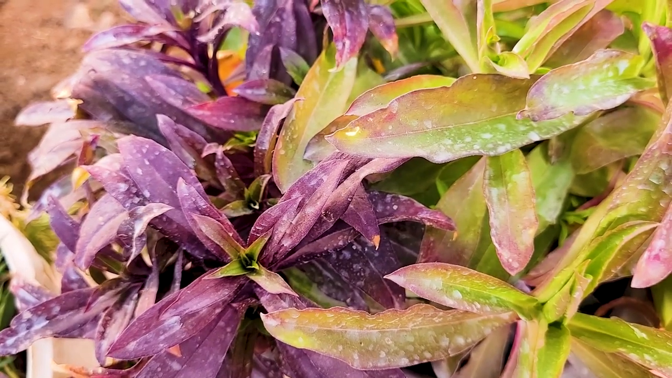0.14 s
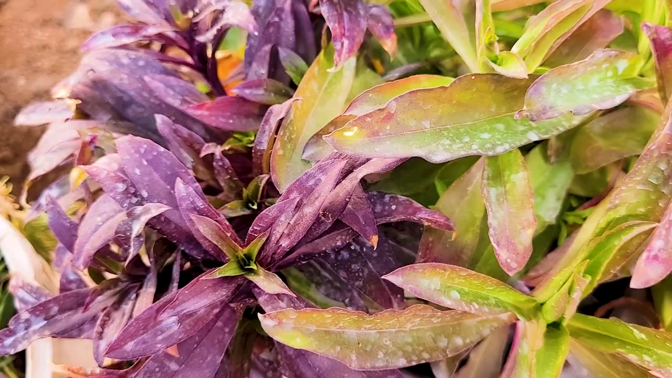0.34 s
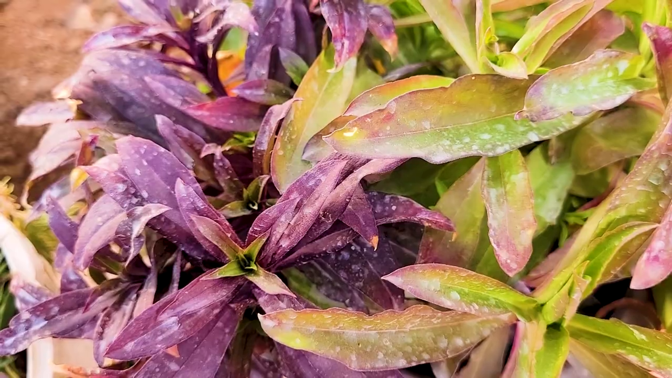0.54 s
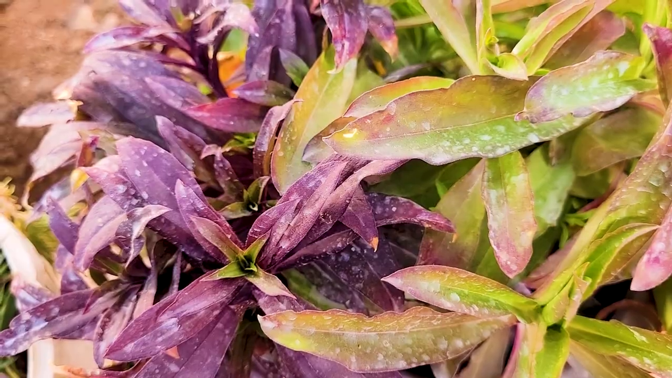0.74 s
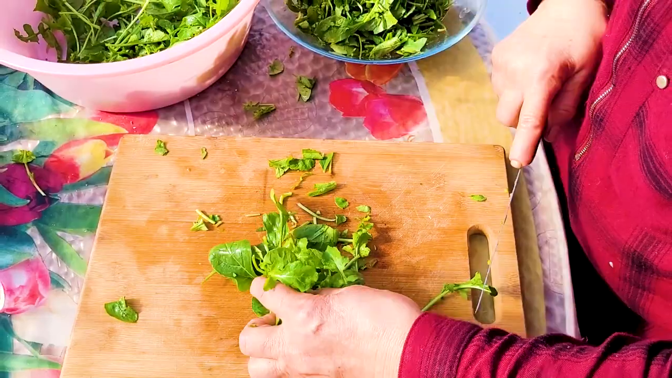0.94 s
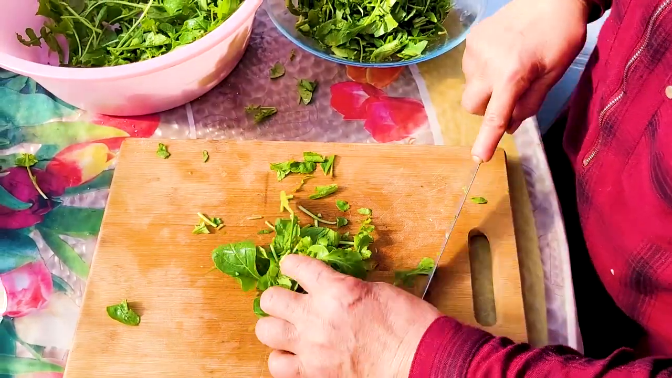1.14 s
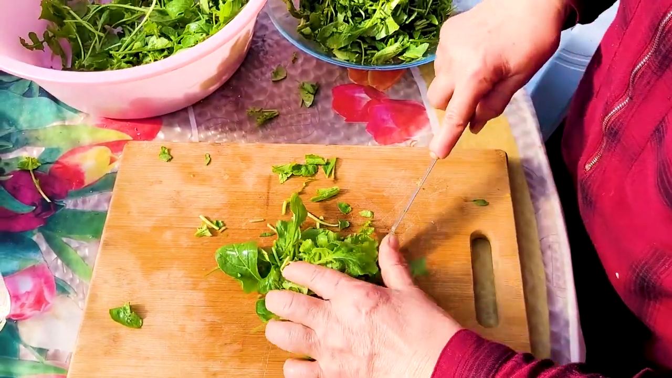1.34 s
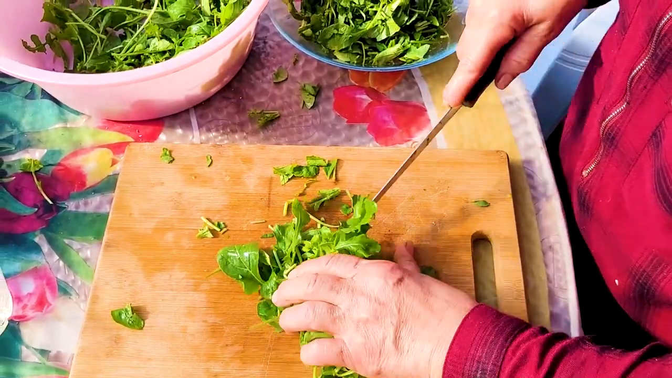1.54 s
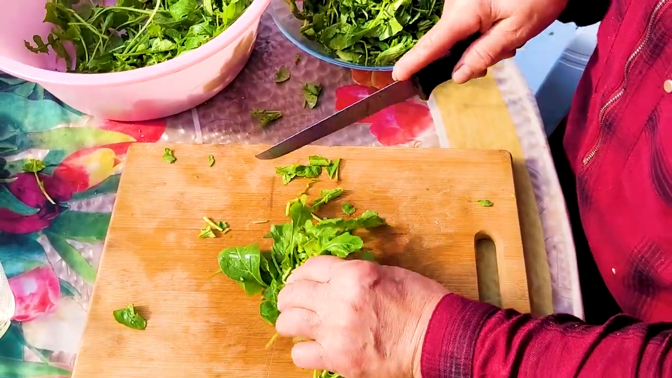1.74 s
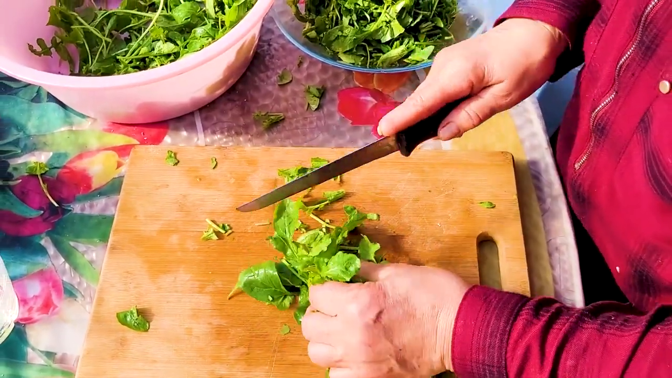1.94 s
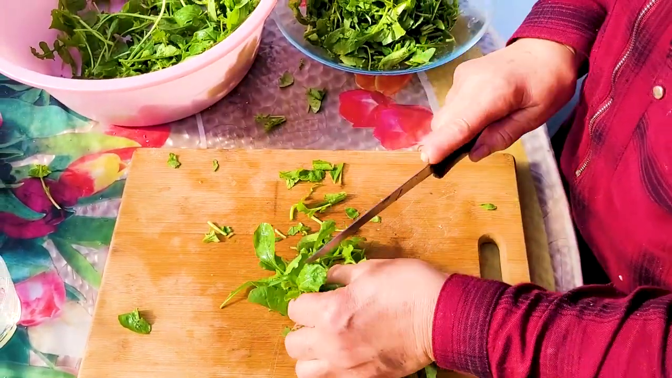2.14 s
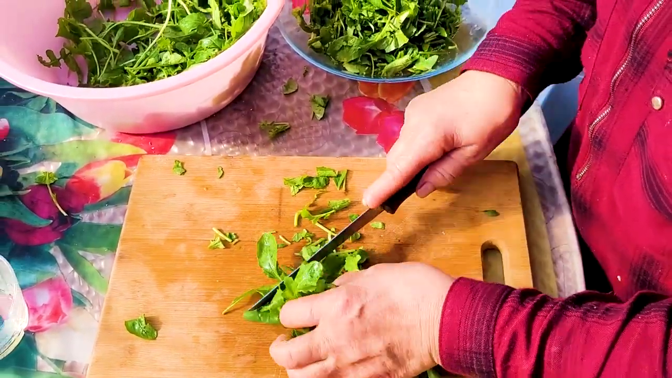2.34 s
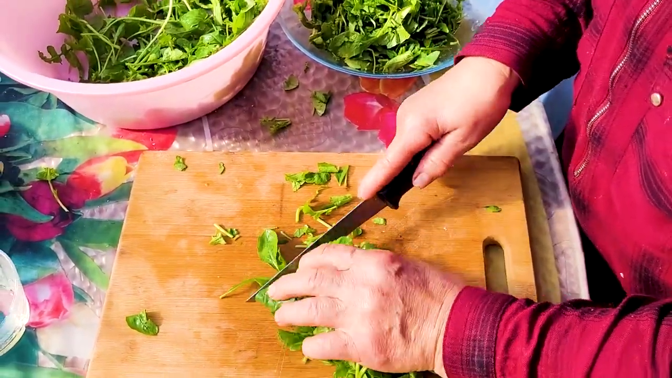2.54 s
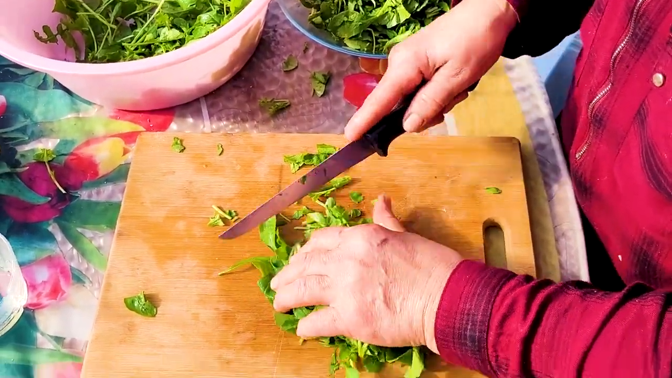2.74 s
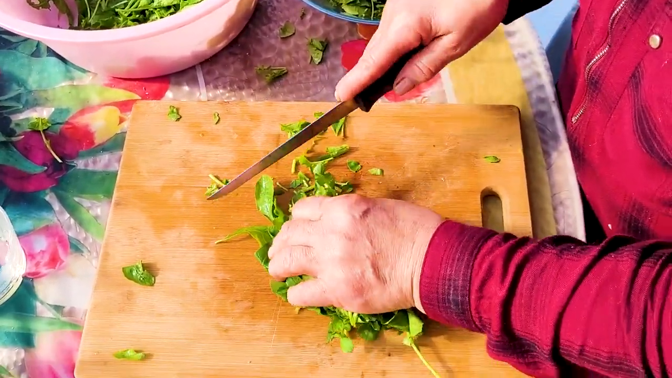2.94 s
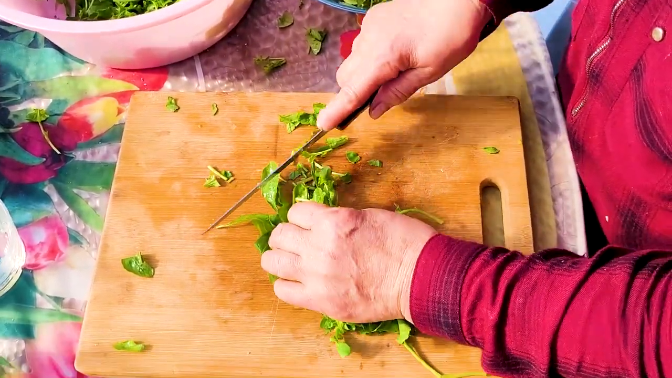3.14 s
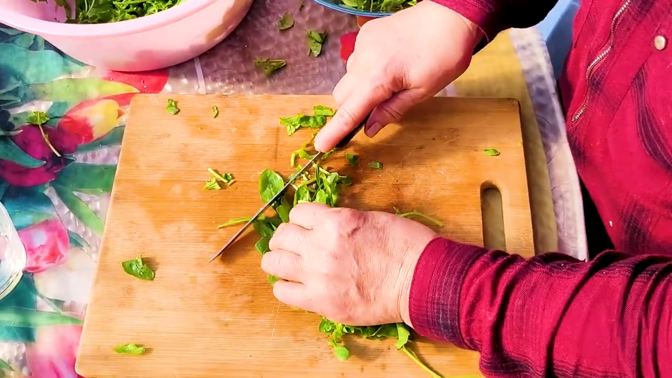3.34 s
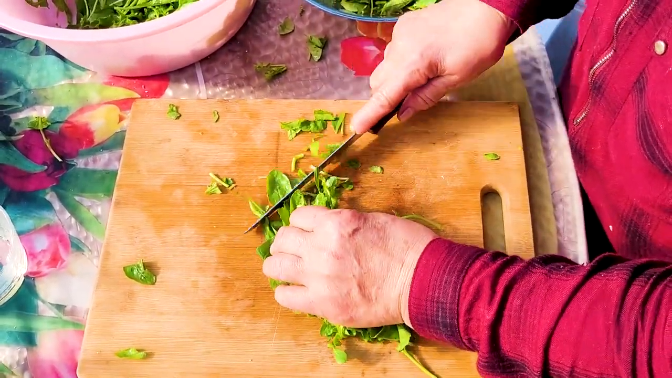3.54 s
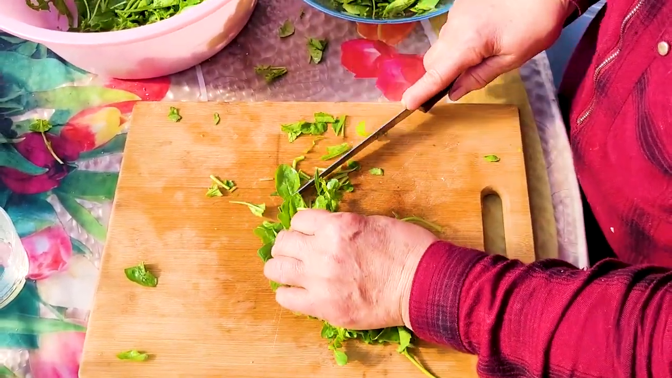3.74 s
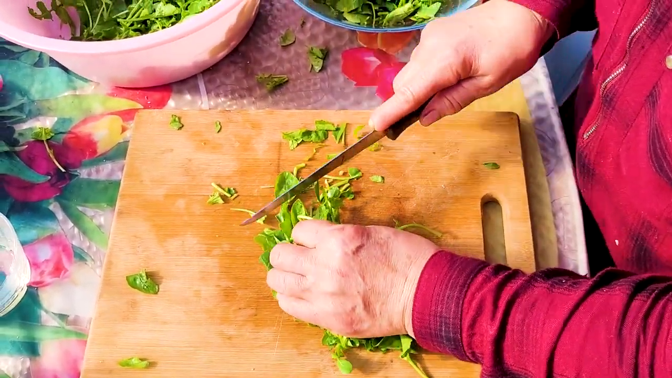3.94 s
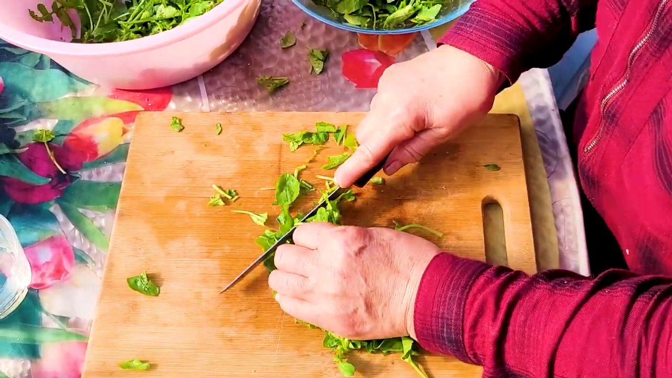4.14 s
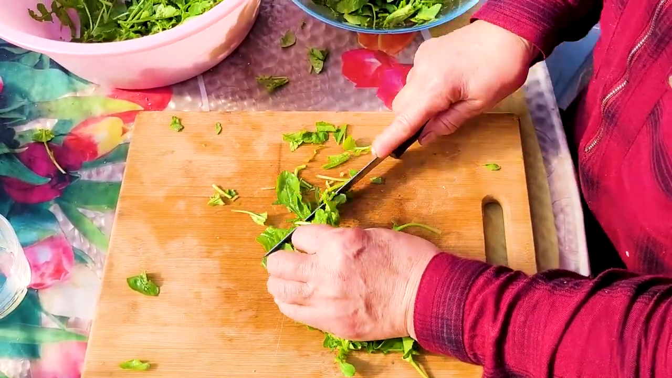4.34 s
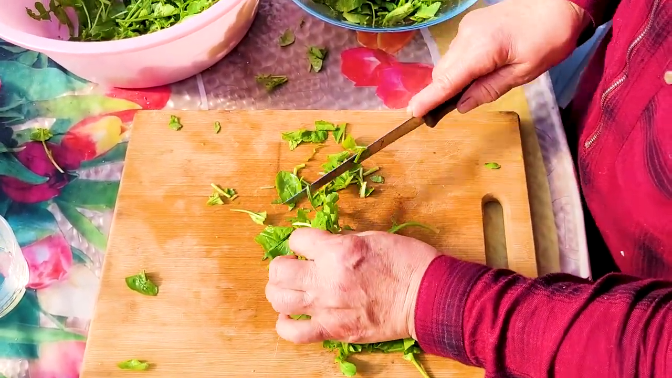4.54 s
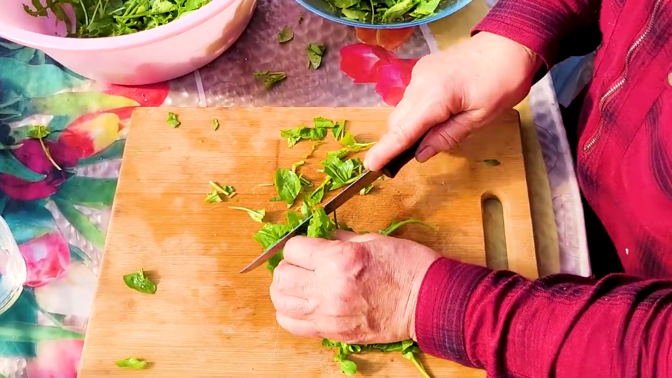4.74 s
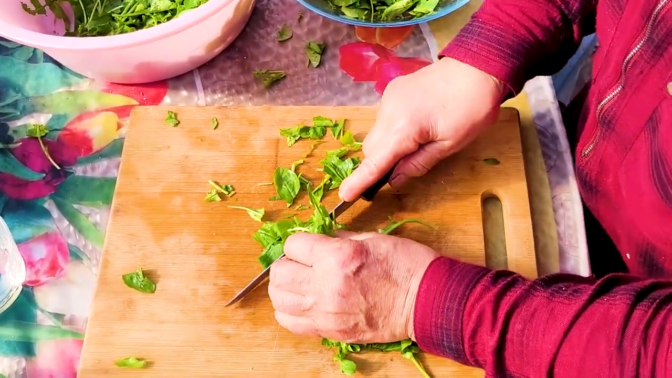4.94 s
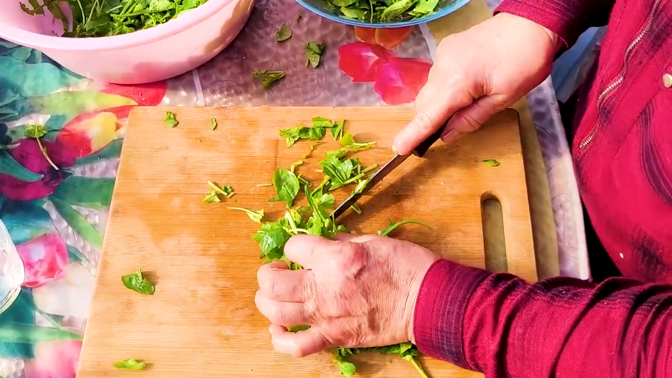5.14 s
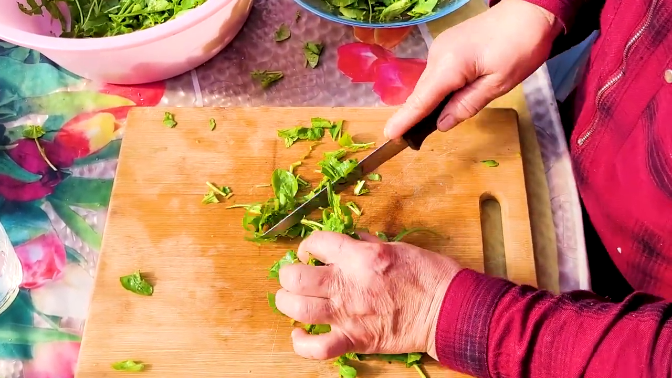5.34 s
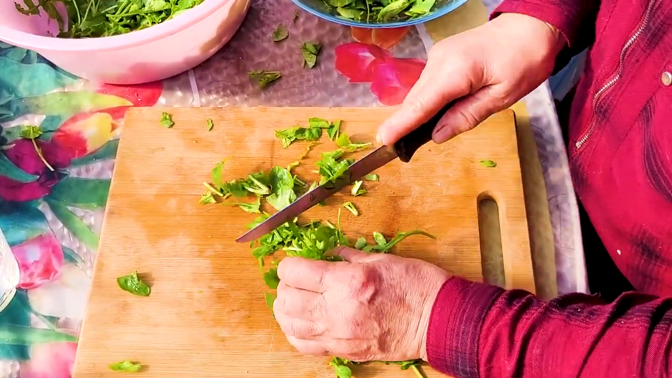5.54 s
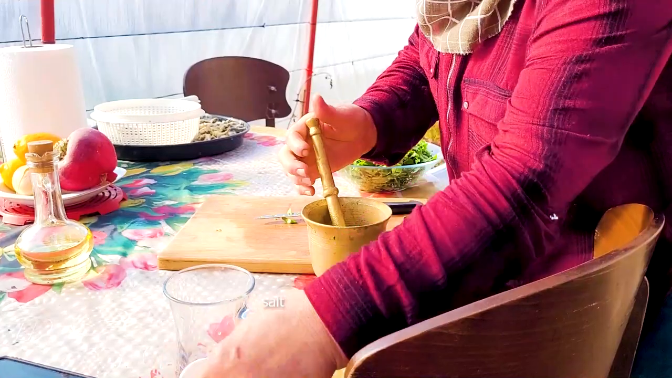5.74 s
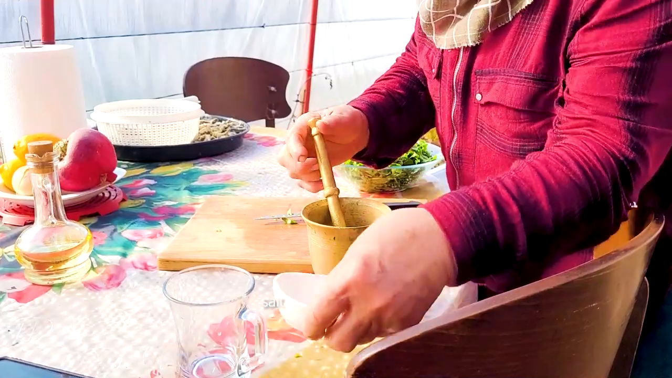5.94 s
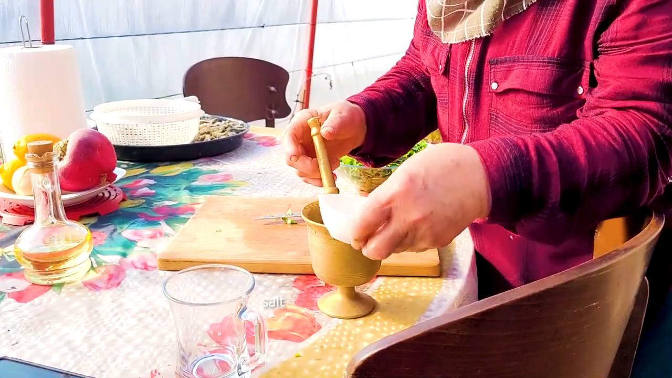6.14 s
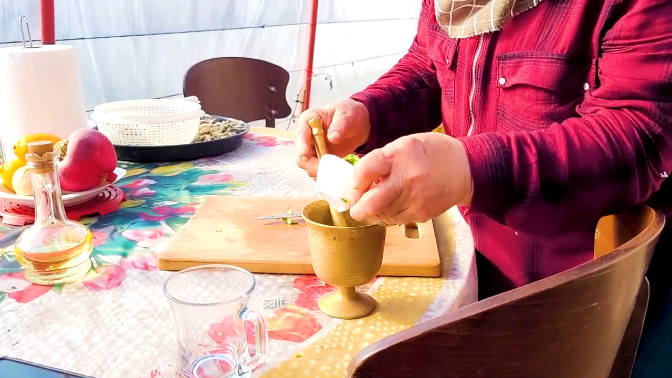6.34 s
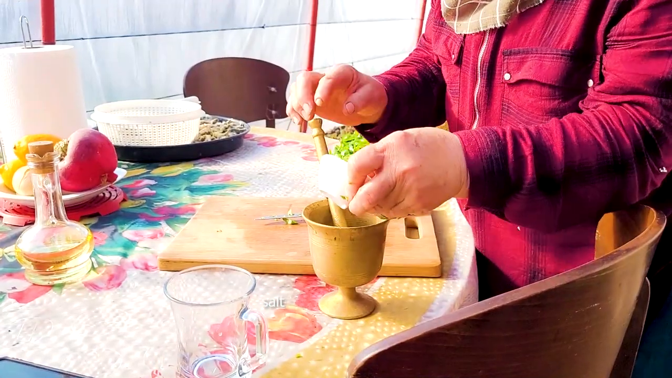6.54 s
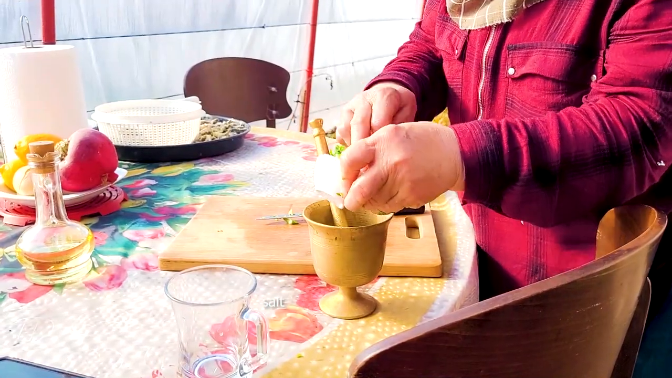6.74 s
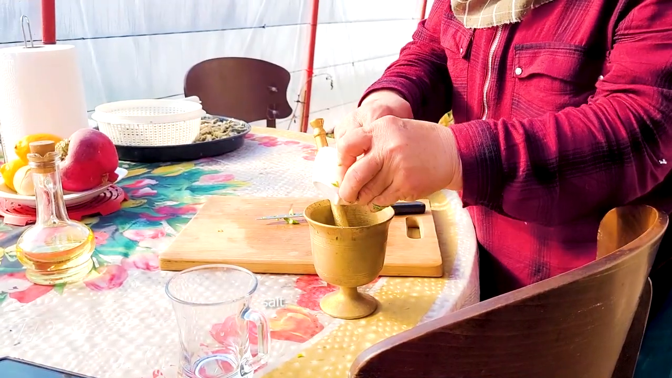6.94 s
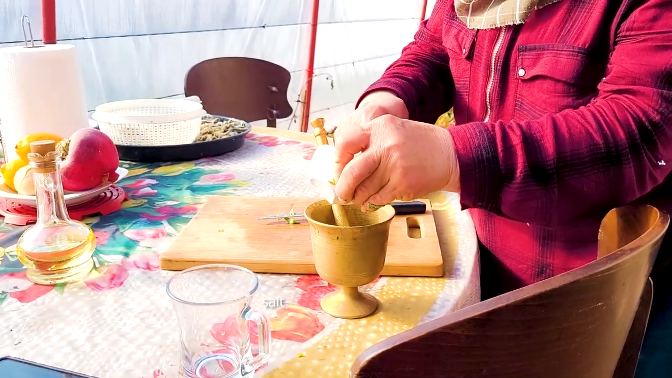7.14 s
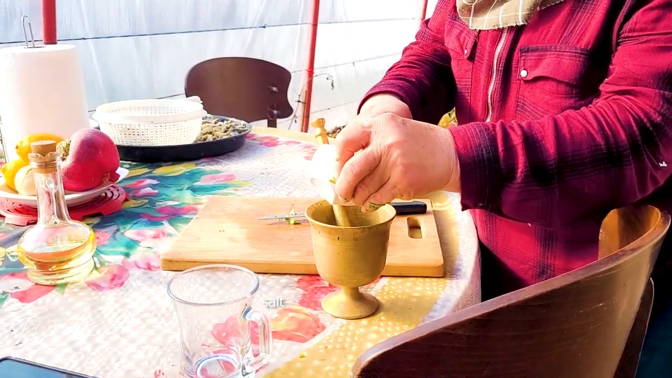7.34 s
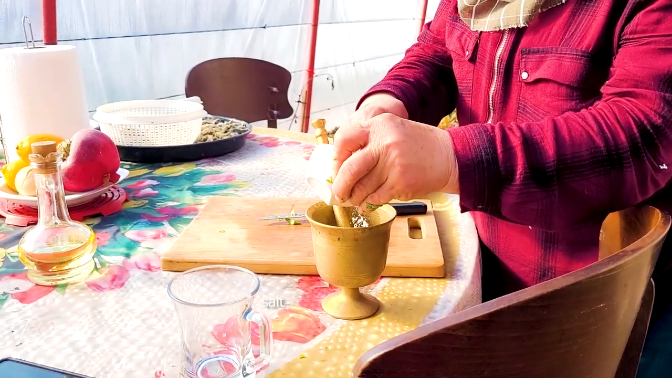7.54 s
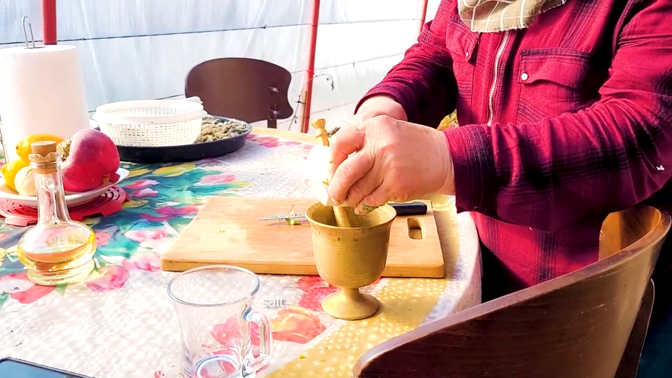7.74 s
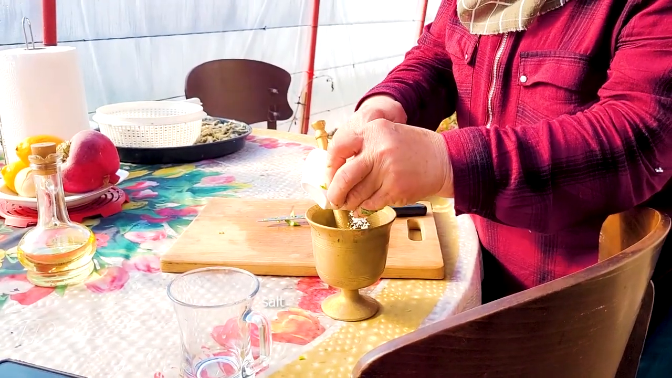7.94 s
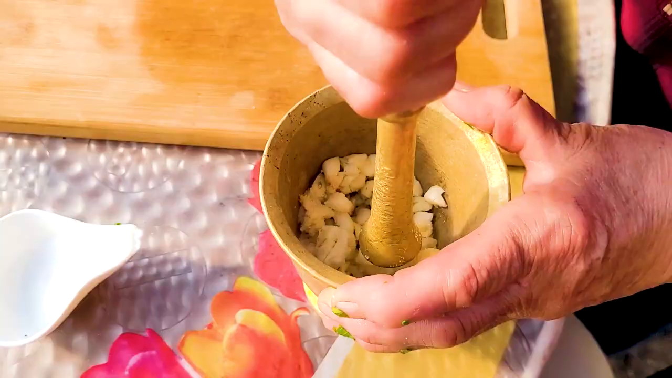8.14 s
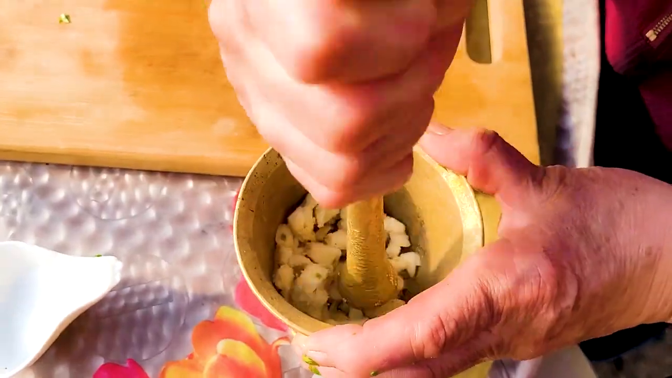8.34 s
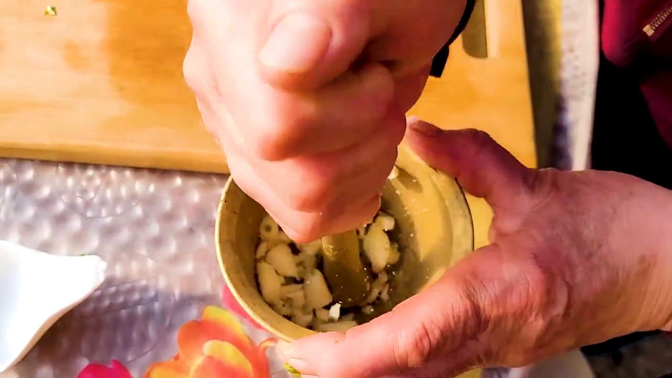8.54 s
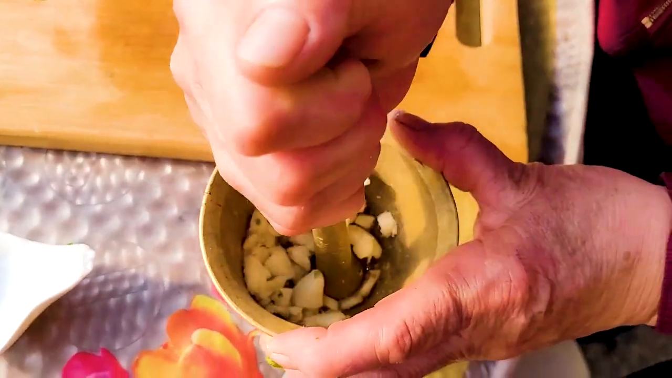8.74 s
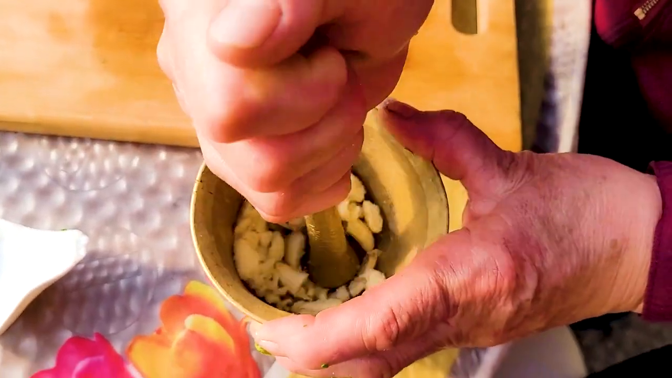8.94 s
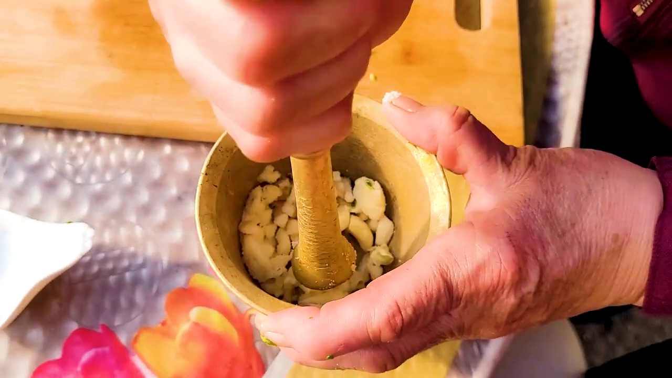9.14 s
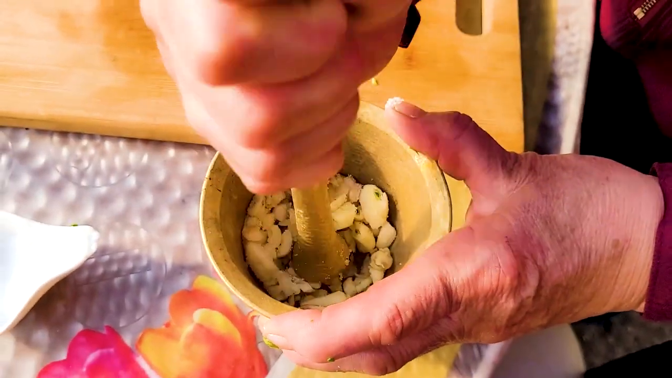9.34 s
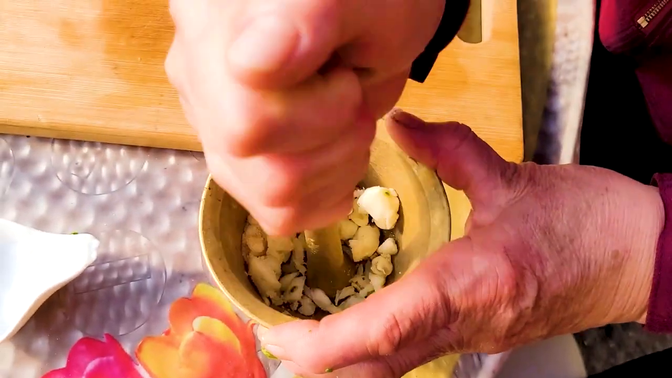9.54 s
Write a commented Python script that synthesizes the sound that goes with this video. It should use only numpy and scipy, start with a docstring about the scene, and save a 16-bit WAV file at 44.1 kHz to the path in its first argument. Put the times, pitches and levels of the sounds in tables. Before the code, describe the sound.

A knife skids and slices through greens on a wooden board, a mortar is bumped, then a pestle thumps and crunches garlic with brassy rattles.

```python
"""Distant garden rumble (tinted noise) with faint clicks ends at 0.8 s; after a short gap hiss and low rumble begin.
A knife skids (stick-slip bursts), knocks on a wooden board (modes) and slices leaves (grainy noise, snaps).
A brass mortar is bumped while being filled with garlic: bare brass modes ring, the table knocks.
From 8.2 s a pestle pounds: each stroke crushes garlic (noise burst) and thumps the table (bending modes);
the mortar rocks back with a rattle. Short reflections follow the mortar sounds."""
import sys
import numpy as np
from scipy import signal
from scipy.fft import rfft, irfft
from scipy.io import wavfile

SR = 44100
rng = np.random.default_rng(int(sys.argv[2]) if len(sys.argv) > 2 else 0)


def log_audio(samples):
    """Write samples as a 16-bit WAV file to the path given in sys.argv[1]."""
    # one column per channel
    frames = np.atleast_2d(samples).T
    # limit to full scale, then quantise
    limited = np.clip(frames, -1, 1)
    pcm = np.round(limited * 32767).astype(np.int16)
    wavfile.write(sys.argv[1], SR, pcm)


N = 422919
T = np.arange(N) / SR

# All dB are relative unless noted. A *_COLOUR lists (frequency [Hz], density [dB per Hz]).

# pestle strokes: (bottom hit [s], garlic gives before that [s], crush [dB], crush t60 [s], table sway [dB],
#   first touch [dB], knock [dB], clack [dB], clatter [dB], thud [dB], thud frequency [Hz], thud t60 [s])
STROKES = [(8.2015, .00111, -34.5, .05, -31, -50, -32, -42, -42, -32, 270, .06),
           (8.444, .00523, -20, .062, -22, -36, -23, -36, -26, -26, 270, .05),
           (8.6946, .0095, -21, .045, -16, -16, -7, -24, -18, -10, 300, .05),
           (8.9423, .0074, -19.5, .04, -14, -23, -7.5, -17, -14, -1, 385, .022),
           (9.201, .005, -20, .045, -19, -35, -25, -34, -25, -27, 370, .09),
           (9.469, .004, -20.5, .06, -24, -33, -31, -39, -30, -27, 260, .09)]
CRUSH_COLOUR = [(300, 9), (1300, -10), (2400, -9.5), (3300, 1), (5000, -3), (6500, 0.5), (9000, -3),
                (12000, -1.5), (16000, -11)]
CRUSH_RISE_MAX_S = .0042
TOUCH_T60_S = .06  # cushioned touch on the garlic
# faint ring lingering in the brass: (frequency [Hz], level [dB], t60 [s])
AFTER_RING = [(1023, 0, .45), (2620, -6, .3), (3435, -9, .4)]
AFTER_RING_DB = -32  # against the crush
SHUDDER_DB, SHUDDER_T60_S = -29.5, 1.23  # low tremble left in the table, against its sway


def strokes():
    """Garlic cushions the pestle, is crushed, then passes the blow on to brass and table."""
    out, shudder_gain = np.zeros((2, N)), np.zeros(N)
    for (s, give_s, crush_db, crush_t60, sway_db, touch_db, knock_db,
         clack_db, clatter_db, thud_db, thud_hz, thud_t60) in STROKES:
        start, crush = burst(s - give_s / 2, crush_db, CRUSH_COLOUR, min(give_s, CRUSH_RISE_MAX_S),
                             crush_t60, tail_db=-39.5, tail_t60=.41, grain_db=1)
        add(out, start, crush * pan(1.3))
        add(out, s - give_s / 2, table_sway(sway_db, scatter_db=.7, detune=.01))
        add(out, s - give_s, thud(touch_db, thud_hz, TOUCH_T60_S))
        add(out, s, knock(knock_db))
        add(out, s, thud(thud_db, thud_hz, thud_t60))
        after_ring = ring(AFTER_RING, detune=0, scatter_db=2, ears_db=2)
        add(out, s, from_db(crush_db + AFTER_RING_DB) * after_ring)
        add(out, *clatter(s, clatter_db))
        # the pestle gets through the garlic to the brass
        add(out, *burst(s + .003, clack_db, RATTLE_COLOUR, rise=.003, t60=.09, tail_db=-19, tail_t60=.25,
                        tilt_db=-2.5, grain_db=2))
        decay_db = -60 * np.maximum(T - s, 0) / SHUDDER_T60_S
        shudder_gain += (T > s) * from_db(sway_db + SHUDDER_DB + decay_db)
    return out, shudder_gain * tint(noise(N), RUMBLE_COLOUR)


# knocks after first touch, from late pestle hits, bounces and the mortar rocking back:
#   (time [s], knock [dB], thud [dB], thud frequency [Hz])
LATER_KNOCKS = [(8.231, -38, -46, 560), (8.459, -29, -36, 600), (8.47, -36, -29, 300),
                (8.487, -26, -31, 600), (8.509, -35, -32, 280), (8.742, -17.5, -24, 560),
                (8.769, -31, -36, 500), (8.991, -20, -21.5, 560), (9.208, -23, -29, 540),
                (9.22, -28, -31, 585), (9.247, -20, -32, 560), (9.28, -31, -36, 570),
                (9.519, -15.5, -29, 380), (9.555, -33, -25, 285)]
LATER_HARDNESS, LATER_T60_S = .9, .055  # knock cut-off ratio to the strokes'; thud decay
LATER_CLATTER_DB = -6.5  # against its knock


def later_knocks():
    """Late pestle hits, bounces and the rocking mortar knock, thud and shake the table things."""
    out = np.zeros((2, N))
    for s, knock_db, thud_db, thud_hz in LATER_KNOCKS:
        add(out, s, knock(knock_db, LATER_HARDNESS))
        add(out, s, thud(thud_db, thud_hz, LATER_T60_S))
        add(out, *clatter(s, knock_db + LATER_CLATTER_DB))
    return out


# mortar chatters, brass on brass: (time [s], level [dB])
RATTLES = [(8.236, -48), (8.497, -29), (8.507, -35), (8.736, -29), (8.745, -29.5), (8.751, -28),
           (8.988, -30), (8.997, -23), (9.005, -28), (9.022, -35), (9.247, -34), (9.257, -27), (9.525, -30),
           (9.532, -34)]
RATTLE_COLOUR = [(300, 7.5), (800, -12.5), (1050, -2), (1300, -1.5), (1650, -5), (1900, -3.5), (2220, 3.5),
                 (2600, -1.5), (3100, -9), (4200, -15), (6500, -30), (12000, -29.5), (16000, -35)]
RATTLE_TAIL_T60_S = .48
# mortar wall, damped by the holding hand: (frequency [Hz], level [dB], t60 [s])
HELD_BRASS = [(1450, -6, .14), (1519, -6, .17), (1606, -6, .2), (1850, -4, .18), (1912, -3, .18),
              (2060, -1, .2), (2186, 2, .18), (2430, -4, .18), (2730, -4, .12), (2881, -8, .17),
              (3419, -11, .2)]
WALL_RING_DB = -7  # against the rattle


def rattles():
    """The rocking mortar's grainy chatter, with its hand-damped wall ringing."""
    out = np.zeros((2, N))
    for s, db in RATTLES:
        add(out, *burst(s, db, RATTLE_COLOUR, rise=.0016, t60=.07, tail_db=-20,
                        tail_t60=RATTLE_TAIL_T60_S, grain_db=3))
        wall = ring(HELD_BRASS, detune=.001, sign=-1, scatter_db=2, ears_db=2)
        add(out, s, from_db(db + WALL_RING_DB) * wall * pan(-3))
    return out


# lifted pestle scuffs the wall: (time [s], peak [dB])
SCUFFS = [(8.356, -45), (8.518, -39), (9.026, -41), (9.276, -38), (9.344, -47), (9.413, -46)]
SCRAPE_COLOUR = [(300, -15), (1000, -16), (1500, -10), (2200, 3), (3300, -1.5), (4500, -9.5), (7000, -7.5),
                 (10000, -16.5), (16000, -17.5)]


def scuffs():
    """Brief friction noise of the pestle along the wall."""
    out = np.zeros((2, N))
    for s, db in SCUFFS:
        add(out, *burst(s, db, SCRAPE_COLOUR, rise=.0023, t60=.1, tail_db=-14, tail_t60=.2))
    return out


def pounding():
    """Pestle blows drive crush, table, later knocks and rattles; a low shudder remains in the table."""
    blows, shudder = strokes()
    return butter(blows + later_knocks() + rattles() + scuffs(), 40, "high") + shudder


# slow bending of the table: (frequency [Hz], level [dB], t60 [s])
SWAY_MODES = [(46, -10, 0.27), (58.09, -1.5, 0.53), (68.73, 7.5, 0.2814), (99.47, -5, 0.35),
              (125.7, -1.5, 0.2), (154.23, -5, 0.32)]


def table_sway(db, scatter_db, detune):
    """Opposed bending modes start from rest and beat, so the boom swells after the blow."""
    bending = ring(SWAY_MODES, detune, sign=-1, scatter_db=scatter_db, ears_db=2)
    return 2 * from_db(db) * butter(bending, 288, "low")


# ring of the table top under the mortar: (frequency [Hz], level [dB], t60 [s])
TABLE_MODES = [(143, -7, .1), (188, -16, .27), (260, -6, .13), (288, -7, .17), (324, 0, .09),
               (377, -1, .17), (515, 1.5, .06), (586, 3, .078), (672, -5, .045), (860, -12, .1),
               (1000, 2, .058), (1115, -6, .09), (1277, -7, .09), (1680, -4, .08)]
CONTACT_HZ, CONTACT_DB_PER_OCTAVE = 950, 23  # cut-off of a 0 dB knock; its growth with level


def knock(db, hardness=1):
    """The table top rings; a weak or cushioned contact takes away the high modes."""
    top = ring(TABLE_MODES, detune=.007, scatter_db=2, ears_db=2)
    cutoff_hz = hardness * CONTACT_HZ * 2 ** (db / CONTACT_DB_PER_OCTAVE)
    return 2 * from_db(db) * butter(top, cutoff_hz, "low", order=3)


def thud(db, hz, t60):
    """A weight lands: a few dull cycles, their pitch set by where and how it lands."""
    t = T[:SR // 5]
    cycles = from_db(db - 60 * t / t60) * np.sin(2 * np.pi * hz * t)
    return butter(cycles, 2 * hz, "low", order=3)


CLATTER_COLOUR = [(60, -14.5), (140, -1.5), (190, 0), (250, 10.5), (380, 3.5), (470, -1), (590, -3),
                  (700, -9), (790, -15.5), (1000, -11), (1200, -21.5), (1500, -23), (1900, -22),
                  (3000, -28), (6000, -59)]


def clatter(s, db):
    """Board, cloth and dishes are shaken for a moment after a knock."""
    return burst(s + .004046, db, CLATTER_COLOUR, rise=.00206, t60=.1122, tail_db=-29.5, tail_t60=.2,
                 width=.86)


# mortar bumped while being filled: (time [s], brass ring [dB], dull bump [dB], scrape [dB])
BUMPS = [(5.869, -81.5, -56, -58), (6.007, -73, -61, -48.5), (6.04, -72, -62, -48.5),
         (6.078, -54, -50, -52), (6.346, -46, -44, -46), (6.353, -35.5, -37, -43), (6.36, -34, -39, -50),
         (6.605, -85, -62, -62), (6.799, -58, -60, -28), (6.838, -75, -48, -58), (6.844, -67.5, -47, -40)]
BUMP_COLOUR = [(50, -15.5), (85, 4), (120, -3), (155, 0), (200, -9), (275, 5), (400, -7.5), (580, -7),
               (900, -22), (2000, -18), (8000, -68)]
BUMP_KNOCK_DB, BUMP_HARDNESS = -7, 3.2  # table ring against the bump; cut-off ratio
# bare brass: (frequency [Hz], level [dB], t60 [s])
BARE_BRASS = [(1226, -14, .27), (1960, -21, .22), (3164, -23, .2), (3324, -12, .12), (3362, 0, .16),
              (3419, -9, .24), (6005, -27, .2), (6089, -24, .26), (8071, -10, .21), (8110, -13, .24),
              (9150, -21, .1), (9733, -30, .2)]
# arms nudge the table: (time [s], level [dB])
NUDGES = [(5.48, -59), (5.67, -60), (5.72, -60), (6.08, -62), (6.65, -58), (6.75, -57), (6.91, -52),
          (6.96, -56), (7.07, -57)]
# sleeves and fingers: (start [s], length [s], rise by 20 dB [s], fall by 20 dB [s], level [dB])
RUSTLES = [(5.98, 0.095, .22, 0.12, -63.5), (6.81, 0.074, .1, 0.11, -66), (7.07, 0.047, .22, 0.1, -66.5),
           (7.6, 0.145, .22, 0.03, -68)]


def filling():
    """Bumps set the bare brass ringing and knock on the table, which arms nudge; hands rustle over it."""
    out = np.zeros((2, N))
    for s, ring_db, bump_db, scrape_db in BUMPS:
        brass = ring(BARE_BRASS, detune=0, sign=-1, scatter_db=1.5, ears_db=2)
        onset = np.minimum(T[:brass.shape[1]] / .00067, 1)
        add(out, s, 2 * from_db(ring_db) * brass * onset)
        add(out, *burst(s + .002937, bump_db, BUMP_COLOUR, rise=.003, t60=.12, tail_db=-19.5, tail_t60=.298))
        add(out, s, knock(bump_db + BUMP_KNOCK_DB, BUMP_HARDNESS))
        start, scrape = burst(s + .0022, scrape_db, SCRAPE_COLOUR, rise=.0012, t60=.04,
                              tail_db=-15, tail_t60=.22, grain_db=2)
        add(out, start, scrape * pan(-3))
    for s, db in NUDGES:
        add(out, s, table_sway(db, scatter_db=3, detune=.04))
    rustle = tint(noise(N, grain_db=3), SCRAPE_COLOUR, tilt_db=2.5)
    return out + swells(RUSTLES) * rustle * pan(-4)


def knife():
    """The blade skids, knocks on the board and rubs its resonances while leaves crunch."""
    blows = skid() * pan(-1.23) + chops() * pan(-5.5)
    return butter(blows, 83, "high", order=3) + rubbing() + leaves()


SKID_COLOUR = [(100, -13), (170, -7), (230, 4), (400, 1), (560, 1.5), (680, -7), (900, -2), (1200, 1.5),
               (1650, -1), (2050, -7), (2750, -2.5), (3400, -12), (4300, -10.5), (4900, -26), (16000, -48)]
SKID_START_S, SKID_END_S = 1.2225, 1.29
SLIP_GAP_S, SLIP_SLOWING = .0084, .028  # first gap; share of it added per slip
SLIP_DB, SLIP_T60_S, SLIP_RING_DB = -23.5, .05, -37  # mean peak, decay, board ring
SKID_TILT_DB, SKID_DULLING_DB = .8, -.28  # brightness per octave at first; its change per slip


def skid():
    """The blade sticks and slips, with gaps tending to lengthen and each gritty slip duller than the last."""
    out, s = np.zeros((2, N)), SKID_START_S
    for k, (uneven, jitter) in enumerate(rng.standard_normal((20, 2))):
        if s < SKID_END_S:
            tilt_db = SKID_TILT_DB + SKID_DULLING_DB * k
            add(out, *burst(s, SLIP_DB + 1.5 * uneven, SKID_COLOUR, .000176, SLIP_T60_S, tail_db=-16,
                            tail_t60=.22, tilt_db=tilt_db, grain_db=1.5, click=.95, width=.98))
            add(out, s, board_ring(SLIP_RING_DB, -2))
        s += SLIP_GAP_S * (1 + SLIP_SLOWING * k + .05 * jitter)
    return out


# blade lands on the board: (time [s], peak [dB], t60 [s], brightness [dB per octave], board thud [dB])
CHOPS = [(3.085, -46.5, 0.134, -0.5, -62), (3.358, -16, 0.042, 3.5, -42), (3.37, -27, 0.023, -1, -50),
         (4.166, -45, 0.074, 1, -58), (4.602, -45.5, 0.068, 1, -62), (4.946, -33, 0.05, 0, -44),
         (5.535, -50, .05, -1, -58)]
BOARD_COLOUR = [(100, -13), (220, -.5), (370, 1), (560, -3.5), (780, -11.5), (940, -6), (1080, -6.5),
                (1480, 3.5), (1900, 2), (2200, -1.5), (2700, 3.5), (3500, -6), (4200, 0.5), (4800, -18.5),
                (6000, -20), (7000, -39), (16000, -53.5)]
BOARD_THUD_HZ, BOARD_THUD_T60_S = 380, .07
CHOP_RING_DB = -3  # board ring against the dry crack


def chops():
    """The blade's dry crack excites the board's thud and modes."""
    out = np.zeros((2, N))
    for s, db, t60, tilt_db, thud_db in CHOPS:
        add(out, s, thud(thud_db, BOARD_THUD_HZ, BOARD_THUD_T60_S))
        add(out, s, board_ring(db + CHOP_RING_DB, tilt_db))
        add(out, *burst(s, db, BOARD_COLOUR, rise=.00007, t60=t60, tail_db=-16, tail_t60=.3,
                        tilt_db=tilt_db, click=.424, width=.454))
    return out


# wooden board: (frequency [Hz], level [dB], t60 [s])
BOARD_MODES = [(372, -3, .13), (668, -6, .08), (1402, -1, .1), (1522, 0, .085), (1690, -6, .06),
               (1912, -1, .075), (2071, -5, .06), (2425, -11, .1), (2615, -8, .1), (2730, -9, .1),
               (3035, -11, .06), (3920, -10, .06), (4115, -10, .07)]


def board_ring(db, tilt_db):
    """The struck board's modes, tilted per octave by the hardness of the blow."""
    modes = [(hz, level + tilt_db * np.log2(hz), t60) for hz, level, t60 in BOARD_MODES]
    return from_db(db) * ring(modes, detune=.002, sign=-1, scatter_db=1, ears_db=2)


# knife strokes through leaves: (start [s], length [s], rise by 20 dB [s], fall by 20 dB [s],
#   crunch [dB], blade rubbing [dB])
SLICES = [(1.623, .16, .08, .05, -64, -72), (1.88, .06, .16, .2, -67, -73), (2.55, .14, .08, .02, -65, -68),
          (2.915, .04, .1, .17, -61, -68), (3.57, .141, .13, .07, -60, -57),
          (4.325, .045, .13, .15, -51, -57), (4.39, .06, .05, .2, -58, -56),
          (4.85, .095, .1, .025, -51, -61), (5.03, .1, .12, .09, -55, -55)]
# blade and board resonances: (frequency [Hz], width per filter pass [Hz], level [dB])
RUB_RESONANCES = [(170, 128, -9), (375.5, 225, -9.5), (1216.4, 178, -3), (1447, 215, -2), (1617, 215, -3),
                  (2621, 185, 2.5), (3074, 164, -5.5), (4165, 690, -4)]


def rubbing():
    """Grainy drag of the blade excites resonances of blade and board."""
    rub, drag = np.zeros((2, N)), noise(N, grain_db=2, width=.8)
    for k, (hz, width_hz, db) in enumerate(RUB_RESONANCES):
        peak = signal.iirpeak(hz, hz / width_hz, fs=SR)
        shifted = np.roll(drag, k * SR, axis=1)  # unrelated noise for each resonance
        once = signal.lfilter(*peak, shifted)
        rub += from_db(db) * signal.lfilter(*peak, once)
    pressing = swells([(*timing, db) for *timing, _, db in SLICES])
    return from_db(5) * pressing * rub / np.std(rub) * pan(-5.5)


# hand gathers leaves: (start [s], length [s], rise by 20 dB [s], fall by 20 dB [s], level [dB])
GATHERING = [(0.842, 4.74, .13, 0.1334, -65)]
LEAF_COLOUR = [(380, -13), (650, -17), (1200, -2), (1800, -2), (2700, 3.5), (4500, 2.5), (6500, -3.5),
               (8200, -4.5), (10000, -5), (12500, -5), (16000, -10.5)]


def leaves():
    """Cut and gathered leaves crunch in fine grains and uneven ticks."""
    friction = .7 * noise(N, grain_db=2.4, width=.8) + .7 * crackle(per_s=330, spread_db=3.6)
    cuts = [(*timing, db) for *timing, db, _ in SLICES]
    cutting = swells(cuts + GATHERING) * (T > TABLE_START_S)
    return from_db(6.5) * cutting * tint(friction, LEAF_COLOUR) * pan(-1.5)


def crackle(per_s, spread_db):
    """Lone ticks of very uneven size at random moments; about unit rms."""
    sizes = from_db(spread_db * np.minimum(rng.exponential(1, N), 3))
    ticks = (rng.random(N) < per_s / SR) * sizes
    decay = np.exp(-1 / (.002 * SR))
    envelope = np.sqrt(signal.lfilter([1], [1, -decay], ticks ** 2 + 1e-18))
    return noise(N, width=.97) * envelope / np.sqrt(np.mean(envelope ** 2))


# loud snaps of stems and garlic skin:
#   (time [s], crack level before its resonance [dB], centre [Hz], left-right [dB])
SNAPS = [(1.0799, -38, 13000, 0), (1.1468, -41, 9000, 0), (1.6257, -39, 2600, -1), (1.6471, -39, 2600, 0.5),
         (1.6791, -38, 11400, 1.5), (1.7773, -39, 2500, 0), (2.2324, -26, 3740, -7),
         (2.5318, -32.5, 3390, -8.5), (2.5608, -36.5, 2970, -9.5), (2.59, -39, 3360, -4),
         (2.6654, -36, 2950, 0), (2.683, -38, 3000, -5), (2.8629, -39, 2900, -3), (2.91, -37, 9000, 0),
         (3.011, -38, 2960, -7), (3.5209, -37, 4090, 0), (4.2243, -40, 2600, -1), (4.353, -33, 12000, 2),
         (4.5836, -41, 2620, 1), (2.923, -27.5, 3740, -7.5), (3.046, -31.5, 3660, -20),
         (3.1584, -35, 3300, -7), (3.5831, -37, 2600, -13), (4.2827, -32.5, 2985, -9),
         (4.4918, -31.5, 3310, -13), (4.511, -38, 3200, -12), (4.525, -36, 3000, -12),
         (4.801, -30.5, 4300, 7), (4.8409, -26, 7000, 1.5), (4.851, -35, 12000, 1), (4.888, -34, 11500, 0),
         (4.904, -27, 4570, -1), (4.911, -29, 11500, 0), (4.932, -30, 4300, -2), (4.997, -38, 4000, -4),
         (5.389, -36.5, 5130, -0.5), (5.5909, -40, 9600, 0), (5.9781, -40, 2780, -6),
         (6.1905, -45, 9200, -1), (7.6033, -47, 6700, -4), (8.145, -46, 14000, 0), (8.757, -32, 9000, 0),
         (9.033, -37, 11500, 2), (9.2645, -36, 9000, 2)]
SNAP_COLOUR = [(300, -11.5), (800, -17.5), (1300, -2), (3500, 1), (6000, -5.5), (12000, -1), (16000, -11)]
# small stems at random: rate, then centres of the random ranges
TICKS_PER_S, TICK_DB, TICK_HZ, TICK_PAN_DB = 6, -47, 3390, -4.5


def snaps():
    """Each snap is a short crack with one resonance; small ones tick at random during the gathering."""
    out, (first, length, *_) = np.zeros((2, N)), GATHERING[0]
    ticks = []
    for when, size, pitch, side in rng.uniform(-1, 1, (round(TICKS_PER_S * length), 4)):
        ticks.append((first + length * (when + 1) / 2, TICK_DB + 2 * size,
                      TICK_HZ * 2 ** (pitch / 2), TICK_PAN_DB + 7 * side))
    for s, db, hz, pan_db in SNAPS + ticks:
        start, crack = burst(s, db, SNAP_COLOUR, rise=.0003, t60=.008, tail_db=-19, tail_t60=.1,
                             click=.6, width=.6)
        tone = signal.lfilter(*signal.iirpeak(min(hz, .4 * SR), 5, fs=SR), crack)
        add(out, start, (.52 * crack + 2.2 * tone) * pan(pan_db))
    return out


def awning(x, t60=.2395):
    """Short scattered reflections from the table things and the shelter, different at each ear."""
    t = T[:SR // 3]
    scatter = butter(rng.standard_normal((2, len(t))), 486, "high")
    echoes = scatter * from_db(-60 * t / t60) * (t > .002)
    echoes /= np.linalg.norm(echoes, axis=1, keepdims=True)
    return signal.oaconvolve(x, echoes, axes=1)[:, :N]


GARDEN_COLOUR = [(18, -37.5), (30, -14), (69, 2), (142, -5), (182, -12), (397, -5.5), (623, -23),
                 (821, -13), (1290, -30.5), (1660, -38), (1970, -43.5), (2290, -43.5), (2870, -42),
                 (3180, -51.5), (12000, -54), (15600, -95.5), (22000, -120)]
GARDEN_DB, GARDEN_END_S = -53.5, .797
# far clicks: (time [s], peak [dB], t60 [s])
FAR_CLICKS = [(.504, -46, .045), (.509, -50, .03), (.553, -53.5, .1), (.627, -57, .015), (.684, -62, .015),
              (.713, -60, .3)]
FAR_CLICK_COLOUR = [(1700, -30), (2200, 1), (2750, 0), (3300, -14), (5000, -21), (14000, -23.5)]


def garden():
    """Distant rumble as tinted noise, with faint far clicks; ends in a short fade."""
    out = from_db(GARDEN_DB) * tint(noise(N), GARDEN_COLOUR) * pan(-2.1)
    for s, db, t60 in FAR_CLICKS:
        add(out, *burst(s, db, FAR_CLICK_COLOUR, rise=.0008, t60=t60, tail_db=-13, tail_t60=.547))
    return out * np.clip((GARDEN_END_S - T) / .0164, 0, 1)


HISS_COLOUR = [(100, -1.5), (350, -.5), (600, -12), (1000, -12), (1400, -7), (2000, -3.5), (2600, -.5),
               (3200, -3), (5500, -5), (7800, -2), (9500, -7.5), (12500, -4.5), (16000, -15)]
# low rumble of handling at the table: (time [s], level before RUMBLE_GAIN_DB [dB])
HANDLING_RUMBLE = [(0.84, -78), (2.96, -80), (3.47, -74), (4.54, -80), (5.4, -78), (6.7, -69), (7.05, -67),
                   (7.59, -73), (8.1, -72.5)]
RUMBLE_COLOUR = [(20, -21.5), (55, 1.5), (90, -2.5), (130, -4.5), (200, -9), (350, -23.5), (700, -35),
                 (2000, -58)]
RUMBLE_GAIN_DB, TABLE_START_S = 4.5, .835


def hiss_and_handling():
    """Thin grainy hiss over the low rumble of handling at the table, changing in level."""
    hiss = from_db(-64) * tint(noise(N, grain_db=1.7747), HISS_COLOUR) * pan(-2.9)
    times, levels_db = np.transpose(HANDLING_RUMBLE)
    rumble = from_db(np.interp(T, times, levels_db) + RUMBLE_GAIN_DB) * tint(noise(N), RUMBLE_COLOUR)
    return (hiss + rumble) * (T > TABLE_START_S)


def from_db(db):
    """Decibels to gain."""
    return np.exp(np.asarray(db) * (np.log(10) / 20))


def butter(x, hz, kind, order=2):
    """Low- or high-pass."""
    return signal.sosfilt(signal.butter(order, min(hz, .45 * SR), kind, fs=SR, output="sos"), x)


def tint(x, spectrum, tilt_db=0, size=4096):
    """Causal (minimum-phase) filter of unit power with the given spectrum, tilted per octave."""
    hz, db = np.transpose(spectrum)
    octave = np.log2(np.maximum(np.arange(size // 2 + 1) * SR / size, 10))
    gain = from_db(np.interp(octave, np.log2(hz), db) + tilt_db * octave)
    cepstrum = irfft(np.log(gain))
    causal = 2 * cepstrum[:size // 2] * (np.arange(size // 2) > 0)
    response = irfft(np.exp(rfft(causal, size)))
    return signal.oaconvolve(x, response[None] / np.linalg.norm(response))[:, :x.shape[1]]


def noise(size, grain_db=0, width=1):
    """Stereo noise, alike in the bass, apart in the treble; grain_db breaks it into half-ms grains."""
    mid, side = rng.standard_normal((2, size))
    grain_gains = from_db(grain_db * np.minimum(rng.exponential(1, size // 24 + 1), 6))
    grains = np.repeat(grain_gains, 24)[:size]
    stereo = mid + width * butter(side, 620, "high", order=1) * [[1], [-1]]
    return stereo * grains / np.sqrt((1 + width ** 2) * np.mean(grains ** 2))


def pan(db):
    """Left and right gains for a level difference."""
    return from_db(np.array([[db], [-db]]) / 2)


def add(out, s, sound):
    """Mix a sound in from time s."""
    at = round(s * SR)
    out[:, at:at + sound.shape[-1]] += sound[..., :N - at]


def swells(rows):
    """Gain curve of gestures that rise, hold and fall; their powers add."""
    t, power = T[::64], 0
    for s, length, attack_s, release_s, db in rows:
        outside = np.maximum(s - t, 0) / attack_s + np.maximum(t - s - length, 0) / release_s
        power = power + from_db(db - 20 * np.minimum(outside, 10)) ** 2
    return np.interp(T, t, np.sqrt(power))


def burst(s, db, colour, rise, t60, tail_db, tail_t60, tilt_db=0, grain_db=0, click=0, width=1):
    """Tiny contacts swell to time s, die and leave a tail; click adds one blow. Gives (start s, sound)."""
    lead_s = .03
    t = T[:round(SR * (lead_s + min(max(t60, tail_t60), .3)))] - lead_s
    after = np.maximum(t, 0)
    decay = from_db(-60 * after / t60) + from_db(tail_db - 60 * after / tail_t60)
    shape = np.exp(np.minimum(t, 0) / rise) * decay
    force = noise(len(t), grain_db, width) * shape
    force[:, round(lead_s * SR)] += click * np.linalg.norm(shape)
    sound = tint(force, colour, tilt_db)
    peak = np.mean(np.sort(np.abs(sound))[:, -4:])
    return s - lead_s, from_db(db) * sound / peak


def ring(modes, detune, sign=1, scatter_db=0, ears_db=0):
    """Struck modes, varied at random by spot struck and grip; sign -1 alternates their polarity."""
    hz, db, t60 = np.transpose(modes)
    strength, side, shift = rng.standard_normal((len(hz), 3)).T
    t = T[:round(SR * t60.max())]
    tuned_hz = hz * (1 + detune * shift)
    waves = from_db(-60 * t / t60[:, None]) * np.cos(2 * np.pi * tuned_hz[:, None] * t)
    polarity = sign ** np.arange(len(hz))
    gains = polarity * from_db(db + scatter_db * strength + ears_db * side * [[.5], [-.5]])
    return gains @ waves / from_db(db).sum()


def scene():
    """All the work at the table, the mortar's reflections, the garden and the hiss."""
    mortar = pounding() + filling()
    left, right = knife() + snaps()
    board = np.array([left, np.roll(right, round(.00013 * SR))])  # board lies a little to the left
    return mortar + from_db(-12.3) * awning(mortar) + board + garden() + hiss_and_handling()


CUTOFF_HZ = 16200


def record(dry):
    """The top of the treble is cut off."""
    return signal.sosfilt(signal.ellip(10, .1, 80, CUTOFF_HZ, fs=SR, output="sos"), dry)


dry = scene()
out = record(dry)
log_audio(out)
```